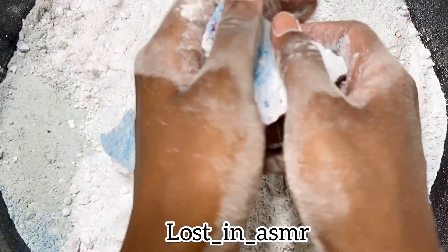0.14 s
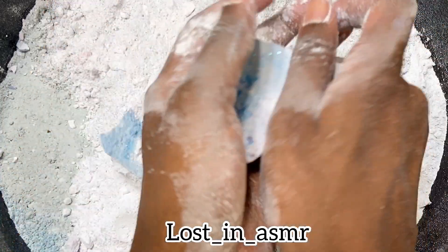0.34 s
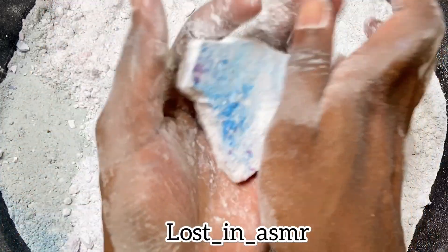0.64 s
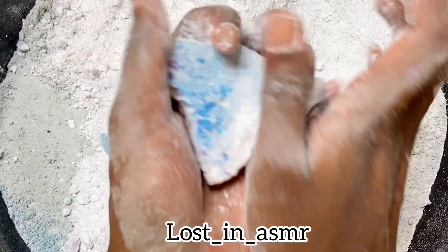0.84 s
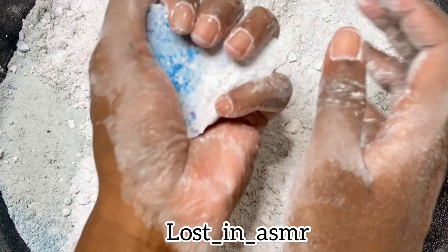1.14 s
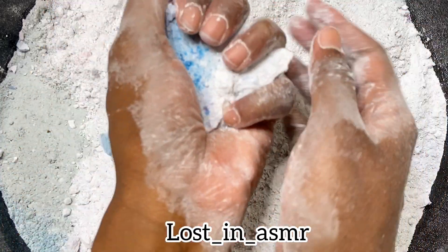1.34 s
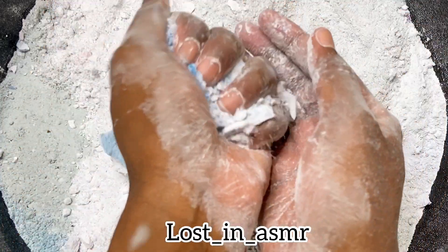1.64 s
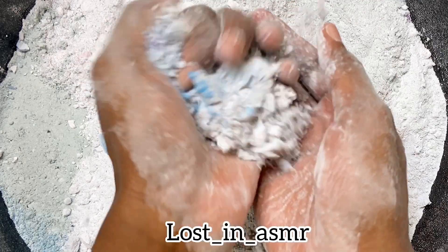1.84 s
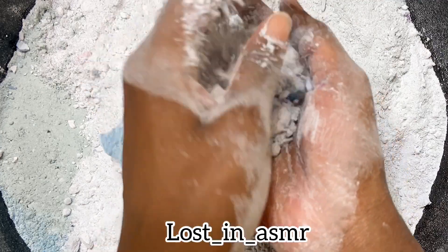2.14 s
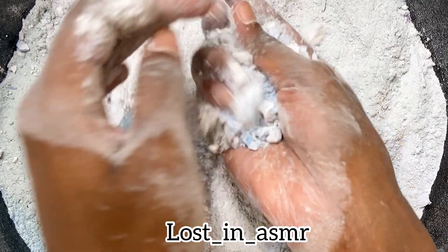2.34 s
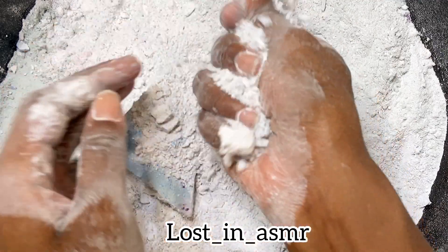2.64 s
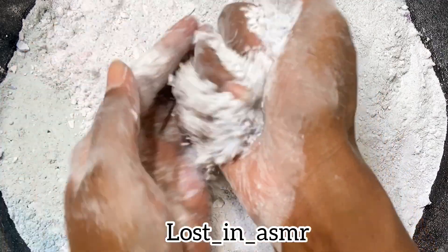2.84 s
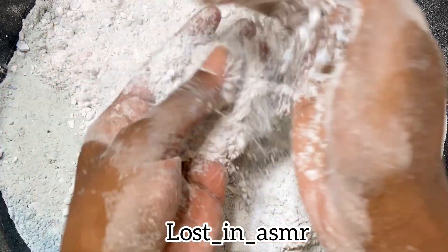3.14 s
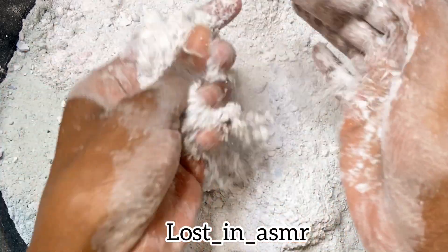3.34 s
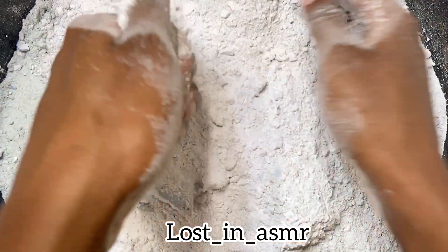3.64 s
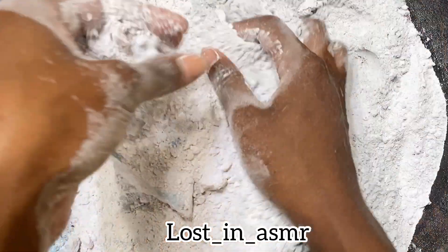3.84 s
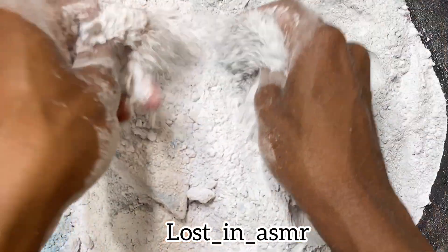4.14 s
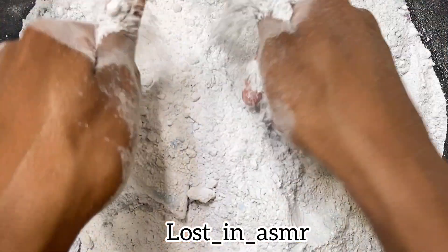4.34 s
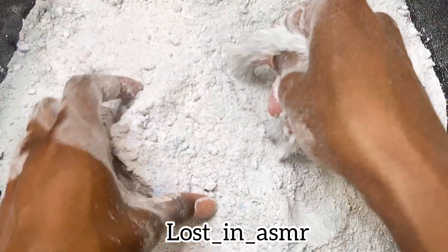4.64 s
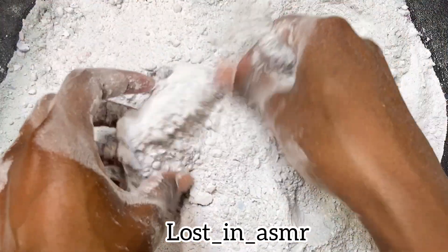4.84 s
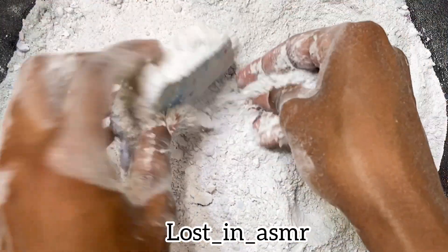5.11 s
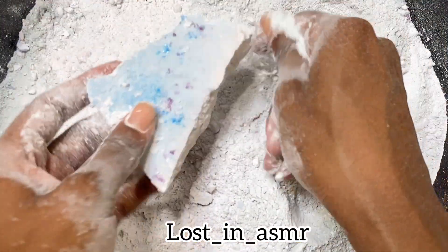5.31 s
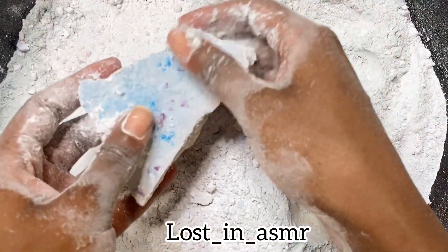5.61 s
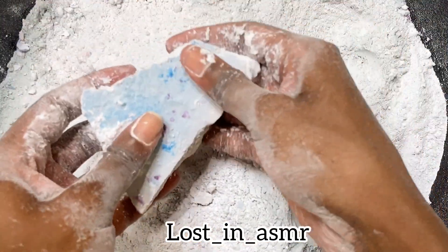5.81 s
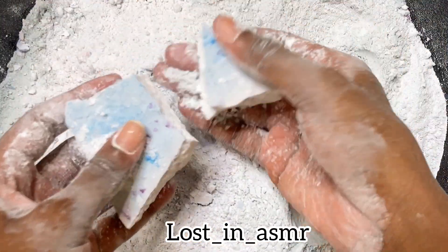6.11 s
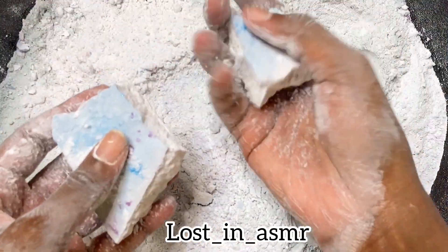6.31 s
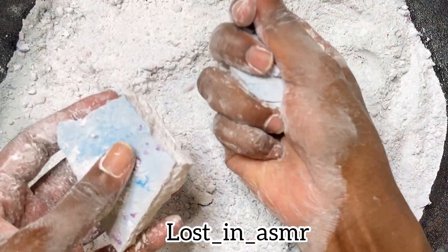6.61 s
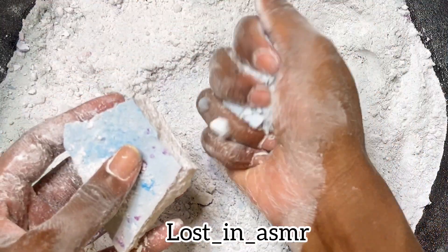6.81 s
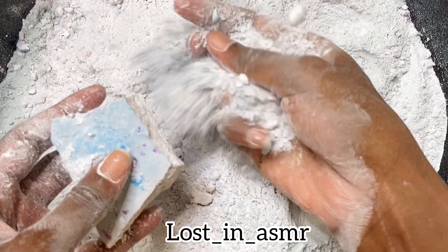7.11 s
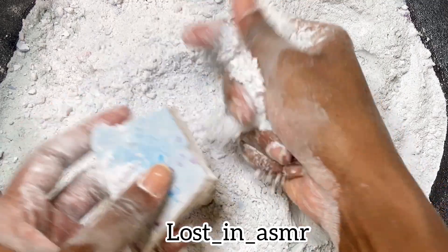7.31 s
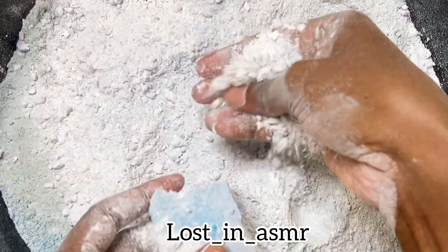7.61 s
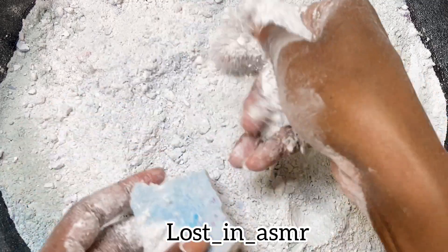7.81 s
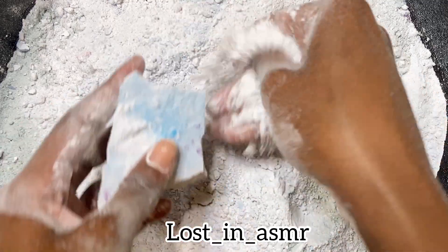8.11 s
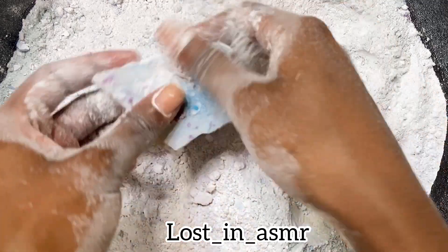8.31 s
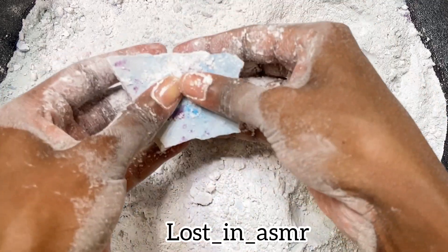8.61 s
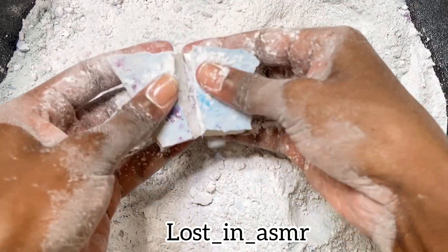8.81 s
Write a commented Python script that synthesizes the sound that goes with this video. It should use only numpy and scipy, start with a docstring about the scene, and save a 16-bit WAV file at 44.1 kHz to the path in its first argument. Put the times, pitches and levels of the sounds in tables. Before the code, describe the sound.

Close-up hands rub, break and crush pressed chalk: brittle cracks, dull crumbly crunches and powdery hiss in a small quiet room with low rumble.

```python
"""Crushing gym chalk by hand

Hands snap slabs of pressed gym chalk and crush them over a tub of powder, close to a phone in a small room.
Breaks are bursts of tiny fractures that ring damped modes; crumbs knock dully in the fist, powder hisses
as dense grains, and rasping skin rings the hollow under the hand.
A machine somewhere in the building hums as two wavering tones over a rumble of filtered noise."""
import sys
import numpy as np
from scipy import signal
from scipy.fft import rfft, irfft, next_fast_len
from scipy.io import wavfile
from scipy.ndimage import uniform_filter1d

SR = 44100
rng = np.random.default_rng(int(sys.argv[2]) if len(sys.argv) > 2 else 0)


def inscribe(sig):
    """Save sig as 16-bit PCM at rate SR to the path in sys.argv[1].

    A 1-D sig is mono; a 2-D sig holds one channel per row.
    Samples are clipped to [-1, 1] before scaling.
    """
    pcm = np.round(np.clip(np.atleast_2d(sig).T, -1, 1) * 32767)
    wavfile.write(sys.argv[1], SR, pcm.astype(np.int16))


N = 394694
TIME = np.arange(N) / SR
SIZE = 2 * next_fast_len((N + SR) // 2)  # padded so that tails do not wrap round
FREQ = np.maximum(np.fft.rfftfreq(SIZE, 1 / SR), 1)


def undb(db):
    """Decibels to gain."""
    return 10 ** (np.asarray(db) / 20)


def unit(x):
    """Scale to rms 1."""
    return x / np.sqrt(np.mean(x ** 2))


def response(points):
    """Gain over frequency from (Hz, dB) points, joined along log frequency."""
    hz, db = np.transpose(points)
    return undb(np.interp(np.log(FREQ), np.log(hz), db))


def shape(x, gain):
    """Filter by a gain over frequency."""
    return irfft(rfft(x, SIZE) * gain)[..., :N]


def causal(points, size=512):
    """Minimum-phase filter with a given spectrum and unit energy, made by folding the cepstrum."""
    cepstrum = irfft(np.log(response(points)))[:size]
    cepstrum[1:] *= 2
    impulse = irfft(np.exp(rfft(cepstrum, 2 * size)))[:size]
    return rfft(impulse / np.linalg.norm(impulse), SIZE)


def colour(x, points):
    """Give a sound a spectrum, at rms 1."""
    return unit(shape(x, causal(points)))


def walk(rate):
    """Smooth random drift of rms 1, heading for a new value `rate` times per second."""
    k = int(SR / rate)
    steps = np.repeat(rng.standard_normal(N // k + 1), k)
    return unit(uniform_filter1d(steps, k)[:N])


def ring(push, hz, t60):
    """One damped resonance, falling 60 dB in t60 seconds."""
    pole = np.exp((2j * np.pi * hz - np.log(1000) / t60) / SR)
    return signal.lfilter([1], [1, -pole], push).imag


def blow(x, db):
    """Scale a short sound to a level taken over 5 ms."""
    return unit(x) * undb(db) * np.sqrt(.005 * SR / x.shape[-1])


def add(track, s, x):
    """Mix a short sound in at a time."""
    i = int(s * SR)
    track[..., i:i + x.shape[-1]] += x[..., :N - i]


def scatter(clicks, width=0.35):
    """Every click comes from its own place between the hands."""
    pan = width * rng.standard_normal(len(clicks))
    return clicks * np.array([1 + pan, 1 - pan])


def grains(rate, spread_db):
    """Random tiny fractures in stereo, `rate` per second: many weak ones and a few strong."""
    size = undb(spread_db * np.minimum(rng.standard_normal(N), 2))
    happens = rng.random(N) < rate / SR
    return scatter(happens * size * rng.choice([-1, 1], N))


def bell(t, length):
    """Gain of a sliding movement around its middle: it speeds up and slows down."""
    edge = 5.2  # how steeply it dies away on either side
    return (1 + (2 * t / length) ** 2 / edge) ** (-edge / 2)


def diffuse(wide_hz):
    """Stereo noise that is alike on both sides in the bass and unrelated in the treble."""
    mid, side = rng.standard_normal((2, N))
    return mid + shape(side, FREQ / np.hypot(FREQ, wide_hz)) * np.array([[1], [-1]])


def hum():
    """Two low tones of the distant machine, each drifting in pitch and wavering in level."""
    # Each row: pitch in Hz, pitch wander in Hz, level in dB, waver in dB, wavers per second.
    tones = [(57.63, 2.263, -34.5, 4.5, 8.7), (110, 5.23, -37.5, 2, 10)]
    out = 0
    for hz, wander_hz, db, waver_db, rate in tones:
        phase = 2 * np.pi * np.cumsum(hz + wander_hz * walk(12)) / SR
        out = out + np.sin(phase) * undb(db + waver_db * walk(rate))
    return out


def rumble():
    """Steady low rumble of the building with a trace of hiss: filtered stereo noise."""
    # Spectrum of the rumble. Each row: frequency in Hz, relative level in dB per Hz.
    spectrum = [(20, -61), (45, 0), (70, 4), (90, -6.5), (125, 0), (220, -16), (600, -29), (1000, -45),
                (3000, -47), (15000, -124)]
    return unit(shape(diffuse(wide_hz=455), response(spectrum))) * undb(-35.5)


def bounce(x):
    """The tub reflects the treble; the path changes as the hands move, so fine ripples glide through the sound."""
    delay_s, sway_s, echo_db, above_hz = .0022, .0003, -6, 4500
    late = TIME - delay_s - sway_s * walk(5)
    treble = signal.lfilter(*signal.butter(2, above_hz, "high", fs=SR), x)
    echo = np.array([np.interp(late, TIME, side) for side in treble])
    return (x + undb(echo_db) * echo) / np.hypot(1, undb(echo_db))


def rub(glide_per_s=.5, cycles=14, size=16384):
    """Skin catches and slips: a fine rasp rings the hollow under the hand, which opens or closes during each stroke."""
    # Dry skin slides over a slab or over chalky skin. Each row: middle in seconds, length in seconds,
    # level in dB, pitch of the hollow under the hand in Hz.
    strokes = [(0.014, 0.05, -36.5, 3500), (0.134, 0.051, -36, 3640), (0.24, 0.06, -46.5, 2300),
               (0.327, 0.051, -52, 1860), (0.39, 0.053, -45.5, 3300), (0.505, 0.085, -44.5, 3540),
               (0.594, 0.039, -31, 3400), (0.66, 0.15, -43, 2250), (0.779, 0.027, -34.5, 2500),
               (0.866, 0.015, -34.5, 2420), (0.942, 0.087, -48, 1680), (1.92, 0.093, -40, 5100),
               (2.707, 0.039, -40.5, 4500), (3.723, 0.034, -43.5, 3000), (4.079, 0.029, -37.5, 3000),
               (4.283, 0.042, -38.5, 3000), (5.115, 0.037, -40.5, 3400), (5.24, 0.047, -41.5, 2720),
               (5.313, 0.033, -45, 2300), (5.38, 0.025, -53, 1520), (5.491, 0.05, -52, 1830),
               (5.605, 0.037, -43.5, 2100), (5.661, 0.012, -49, 2050), (5.999, 0.069, -45.5, 3200),
               (6.113, 0.045, -40.5, 4500), (6.198, 0.039, -34.5, 3200), (6.285, 0.043, -36.5, 3180),
               (6.385, 0.05, -40.5, 2330), (6.959, 0.029, -34.5, 4800), (7.42, 0.078, -56, 4500),
               (7.517, 0.036, -45.5, 3000), (7.72, 0.16, -45.5, 2960), (8.091, 0.0099, -33.5, 4550),
               (8.152, 0.033, -40, 2400), (8.226, 0.063, -47.5, 4460), (8.327, 0.036, -45, 2800),
               (8.421, 0.031, -44, 2980), (8.845, 0.023, -42, 5450), (8.929, 0.13, -44, 5450)]
    # Spectrum of the rasp. Each row: frequency in Hz, relative level in dB per Hz.
    spectrum = [(1000, -20), (2200, 2.5), (4000, 0.5), (5800, 3.5), (15500, 0)]
    # Resonances between hand and slab. Each row: multiple of the hollow's pitch, relative level in dB.
    hollow_modes = [(1, 1), (1.48, -1), (2.3, -3.5)]
    # the hollow's ring grows more slowly with force than the rasp, so light strokes are duller
    hollow_db, hollow_growth = -27, 0.59
    slips = grains(rate=13000, spread_db=2.5)
    rasp = colour(slips, spectrum)
    jerks = np.diff(slips, prepend=0)
    out = np.zeros((2, N))
    glides = glide_per_s * rng.uniform(-1, 1, len(strokes))
    for (s, length, db, hz), glide in zip(strokes, glides):
        near = slice(max(int(s * SR) - size, 0), int(s * SR) + size)
        t = TIME[near] - s
        modes = 0
        for ratio, mode_db in hollow_modes:
            mode = ring(jerks[:, near], hz * ratio, cycles / hz / ratio)
            modes = modes + undb(mode_db) * unit(mode)
        # reading the ring ever faster or slower bends its pitch
        warped = t + glide * t ** 2 / 2
        modes = np.array([np.interp(warped, t, side) for side in modes])
        # little of the rasp escapes below the hollow's pitch
        hiss = unit(signal.lfilter(*signal.butter(2, hz, "high", fs=SR), rasp[:, near]))
        stroke = undb(db) * hiss + undb(hollow_db + hollow_growth * db) * modes
        out[:, near] += bell(t, length) * stroke
    return bounce(out) * undb(2 * walk(120))


def cracks(cycles=7.4, rough=1.0, upper_db=-5, debris_db=-10.5, grit_db=3, size=4096, count=64):
    """Tiny fractures gather, the piece breaks and knocks in the hand, then its debris crunches on."""
    # Pieces breaking and knocking. Each row: time in seconds, knock level in dB, knock pitch in Hz,
    # fracture spray level in dB, length of the break in seconds.
    breaks = [(0.472, -39.5, 1610, -41, 0.0036), (0.907, -43, 890, -41, 0.0024),
              (1.036, -44, 1310, -45.5, 0.0021), (1.173, -23, 960, -21.5, 0.0045),
              (1.192, -28.5, 970, -30, 0.0031), (1.324, -22, 1260, -26, 0.0091),
              (1.353, -40, 1640, -42, 0.0022), (1.4, -31, 1510, -36, 0.0024),
              (1.446, -30.5, 1080, -35, 0.0027), (1.457, -22.5, 1500, -28, 0.014),
              (1.478, -24, 1400, -25, 0.012), (1.61, -37.5, 1090, -49, 0.0022),
              (1.666, -32.5, 1440, -44, 0.0014), (1.69, -33, 1520, -44, 0.009),
              (2.497, -27.5, 720, -35, 0.0047), (2.611, -30.5, 1400, -40, 0.0038),
              (2.626, -33.5, 895, -52, 0.0026), (2.749, -22.5, 2500, -36, 0.0025),
              (2.7504, -14.5, 850, -45, 0.0024), (2.951, -33, 900, -44, 0.0023),
              (2.986, -33.5, 820, -41, 0.0036), (2.998, -35, 780, -43, 0.0037),
              (3.075, -35, 1140, -38, 0.0038), (4.996, -32, 724, -50, 0.0023),
              (5.006, -31.5, 633, -60, 0.0068), (5.16, -36, 1220, -54, 0.0011),
              (5.757, -39.5, 1950, -44.5, 0.003), (5.793, -27.5, 530, -30.5, 0.0021),
              (6.413, -29, 2470, -35, 0.0023), (6.44, -21.5, 1210, -23.5, 0.002),
              (6.464, -26.5, 2210, -33, 0.02), (6.502, -22, 1440, -30.5, 0.0019),
              (6.584, -30.5, 1390, -39, 0.0081), (6.614, -32, 985, -40, 0.0056),
              (6.644, -30, 1260, -52, 0.002), (6.687, -24.5, 1340, -27.5, 0.016),
              (6.692, -27, 1580, -28.5, .002), (6.789, -30, 1150, -47, 0.0078),
              (6.835, -33, 1210, -30, 0.0041), (7.581, -34.5, 1460, -50, 0.0028),
              (7.701, -36, 1400, -42, 0.002), (7.874, -38.5, 1190, -49, 0.0056), (8, -33, 660, -44, 0.0022),
              (8.052, -34.5, 1400, -49, 0.0051), (8.647, -20, 512, -30.5, 0.0023),
              (8.668, -31.5, 680, -27, 0.0042)]
    # Spectrum of the fracture spray. Each row: frequency in Hz, relative level in dB per Hz.
    spectrum = [(600, -26), (2000, 11.5), (5000, 9.5), (9000, 4), (15500, -2)]
    creak_db, creak_s, debris_s = -15, .004, .018
    knocks, sprays = np.zeros((2, 2, N))
    lead = size // 8  # samples of creaking ahead of the break
    t = (np.arange(size) - lead) / SR
    creak = undb(creak_db) * np.exp(-abs(t) / creak_s)
    debris = undb(debris_db) * np.exp(-abs(t) / debris_s)
    for s, knock_db, hz, spray_db, length in breaks:
        late = np.maximum(t, 0) / length
        burst = np.pi * late * np.exp(-2 * late ** 2)
        # creak and debris come in uneven fits
        fits = np.repeat(np.minimum(rng.standard_normal(count), 2), size // count)
        skirts = np.where(t < 0, creak, debris) * undb(grit_db * fits)
        coarse, fine = (scatter(noise * (burst + skirts)) for noise in rng.standard_normal((2, size)))
        # a quick break is mostly one clean push, a slow one a ragged series
        push = rough * length / .002 * coarse / np.linalg.norm(coarse[0])
        push[:, lead + int(length * SR / 4)] += 1
        # the piece rings in a damped main mode and two weaker upper ones of alternating sign
        knock = 0
        for k, ratio in enumerate([1, 2, 3.3]):
            knock = knock + (-undb(upper_db)) ** k * ring(push, hz * ratio, cycles / hz / ratio)
        add(knocks, s - lead / SR, blow(knock, knock_db))
        add(sprays, s - lead / SR, blow(fine, spray_db))
    return knocks + shape(sprays, causal(spectrum))


def squeeze(start, held):
    """Pressure of one squeeze: it builds, holds and dies away."""
    press_s, release_s = 0.062, 0.1  # time constants of the grip closing and of the chalk settling
    closing = np.minimum(TIME - start, 0) / press_s
    settling = np.maximum(TIME - start - held, 0) / release_s
    return np.exp(closing - settling)


def fist():
    """Crumb gain, powder gain and firmness over time: every squeeze turns crumbs into powder."""
    # The fist closes on chalk. Each row: full pressure reached in seconds, held in seconds,
    # crumb level in dB, powder level in dB.
    squeezes = [(1.19, 0.038, -57, -52), (1.35, 0.2, -45, -47.5), (1.675, 0.02, -43.5, -38.5),
                (1.86, 0.051, -46.5, -44), (2.09, 0.26, -54.5, -46), (2.268, 0.6, -41.5, -42.5),
                (2.96, 0.098, -46.5, -45.5), (3.167, 0.4, -45, -43.5), (3.69, 0.14, -46, -55),
                (3.93, 0.18, -41, -45), (4.18, 0.035, -45.5, -42.5), (4.428, 0.23, -42, -45.5),
                (4.79, 0.053, -56.5, -50.5), (4.975, 0.036, -44.5, -55), (5.07, 0.17, -46.5, -48.5),
                (6.45, 0.15, -49.5, -46), (6.70, 0.15, -42.5, -40.5), (7.118, 0.14, -40, -41),
                (7.598, 0.13, -40.5, -47), (8.003, 0.028, -40, -39)]
    # A fresh piece goes into the fist; its hard crumbs knock higher, then soften. Times in seconds.
    fresh = [1.3, 6.4]
    firm_db_per_octave, soften_s = 6, 0.5
    crush_db = 1  # over one squeeze the crumbs lose this much and the powder gains it
    peak_bite_db, bite_s = 4, 0.037  # the first lumps give way with extra force at full pressure
    crumbs, dust = np.zeros((2, N))
    for start, held, crumbs_db, powder_db in squeezes:
        pressure = squeeze(start, held)
        crushed_db = crush_db * (np.clip((TIME - start) / held, 0, 1) - .5)
        bite_db = peak_bite_db * (TIME > start) * np.exp(-abs(TIME - start) / bite_s)
        # overlapping squeezes add in power
        crumbs += (pressure * undb(crumbs_db + bite_db - crushed_db)) ** 2
        dust += (pressure * undb(powder_db + crushed_db)) ** 2
    freshness = sum((TIME > s) * np.exp(-abs(TIME - s) / soften_s) for s in fresh)
    return np.sqrt(crumbs), np.sqrt(dust), firm_db_per_octave * freshness


def crumble(gain, firmness, rate=105, spread_db=2.8, cycles=7.5, judder_db=2.0, count=10):
    """Crumbs of many sizes give way in fits, each with a brief knock at the pitch of its size."""
    # Spectrum of the crumbs. Each row: frequency in Hz, relative level in dB per Hz.
    spectrum = [(150, 6), (430, -2.5), (610, 4), (1130, -4.5), (1520, 0.6), (1950, -9), (3000, -10.5),
                (8000, -29.5)]
    tilt = undb(firmness)  # gain per octave above 1 kHz
    knocks = 0
    for hz in np.geomspace(350, 4000, count):
        knock = unit(ring(grains(rate, spread_db), hz, cycles / hz))
        knocks = knocks + np.sqrt(hz) * knock * tilt ** np.log2(hz / 1000)
    return colour(knocks, spectrum) * gain * undb(judder_db * walk(90))


def powder(gain, uneven_db=2.5):
    """Fine grains shear past each other in an uneven hiss."""
    # Spectrum of the hiss. Each row: frequency in Hz, relative level in dB per Hz.
    spectrum = [(800, 0.55), (2400, 11), (4000, 6.3), (7000, 7.2), (10000, 2), (15500, 5.35)]
    hiss = colour(grains(rate=9000, spread_db=4), spectrum)
    return hiss * gain * undb(uneven_db * walk(45))


def thuds(size=8192):
    """The low bump of flesh recoiling, and the short ring of the tub below."""
    # The hands recoil when a big piece gives way or lands. Each row: time in seconds, level in dB,
    # pitch in Hz, 60 dB decay in seconds.
    recoils = [(2.751, -32, 202, 0.12), (5.793, -29, 168, 0.041), (6.414, -30.5, 211, 0.023),
               (8.649, -17.5, 160, 0.015)]
    tub_hz, tub_t60_s, tub_db = [533, 600, 670], 0.25, -11  # tub level is against the bump
    out, push = np.zeros(N), signal.unit_impulse(size)
    tub = sum(ring(push, hz, tub_t60_s) for hz in tub_hz)
    for s, db, hz, t60 in recoils:
        bump = blow(ring(push, hz, t60), db)
        add(out, s, bump + blow(tub, db + tub_db))
    return out


def palms(hz=260):
    """Muffled shuffle of flesh pressing into powder: noise through one broad low resonance."""
    # Palms press into the heap. Each row: middle in seconds, length in seconds, level in dB.
    presses = [(3.81, 0.11, -39)]
    shuffle = unit(ring(rng.standard_normal(N), hz, 4 / hz))
    return shuffle * sum(undb(db) * bell(TIME - s, length) for s, length, db in presses)


def room(x, t60=0.33, wet_db=-6.5, dull_hz=7000, gap=0.0053):
    """Near walls answer after a few milliseconds with a short, duller tail of decaying noise."""
    fade_in = np.clip(TIME / gap - 1, 0, 1)  # silent for one gap (s), full after two
    tail = diffuse(wide_hz=150) * undb(-60 * TIME / t60) * fade_in
    tail /= np.linalg.norm(tail, axis=1, keepdims=True)
    dull = np.hypot(1, (FREQ / dull_hz) ** 2)
    return x + undb(wet_db) * shape(x, rfft(tail, SIZE) / dull)


def scene(loose_db=-68):
    """Chalk and hands in the room, over the hum; a few loose crumbs keep shifting between squeezes."""
    crumbs, dust, firmness = fist()
    loose = undb(loose_db)
    chalk = rub() + cracks() + thuds() + palms()
    chalk = chalk + crumble(np.hypot(crumbs, loose), firmness) + powder(np.hypot(dust, loose))
    return room(chalk) + hum() + rumble()


def record(dry):
    """The phone's stereo narrows in the treble, its two ports differ in level and phase, and the top is cut steeply."""
    # Phase of the right port against the left. Each row: frequency in Hz, lag in radians.
    port_lag = [(1200, 0), (2500, -1.4), (6800, .3), (9200, 3.14), (11800, 6.2), (13000, 6.4), (15300, 9.4)]
    # Level of the ports. Each row: frequency in Hz, left minus right in dB.
    port_balance = [(200, -1.5), (700, 0), (2400, -3), (4400, -4.5), (7500, 0)]
    top_hz = 15750
    mid = dry.mean(axis=0)
    stereo = mid + shape(dry - mid, 1 / np.hypot(1, (FREQ / 7500) ** 2.5))
    tilt = np.sqrt(response(port_balance))  # each port takes half of the difference
    lag = np.exp(-1j * np.interp(FREQ, *np.transpose(port_lag)))
    top = np.clip((top_hz - FREQ) / 150 + .5, 0, 1)
    return shape(stereo, np.array([tilt, lag / tilt]) * top)


dry = scene()
out = record(dry)
inscribe(out)
```